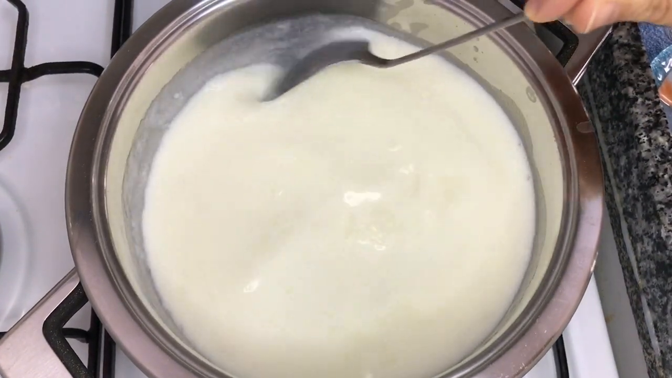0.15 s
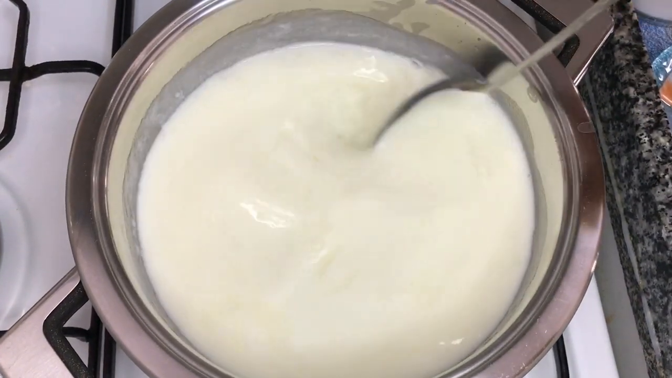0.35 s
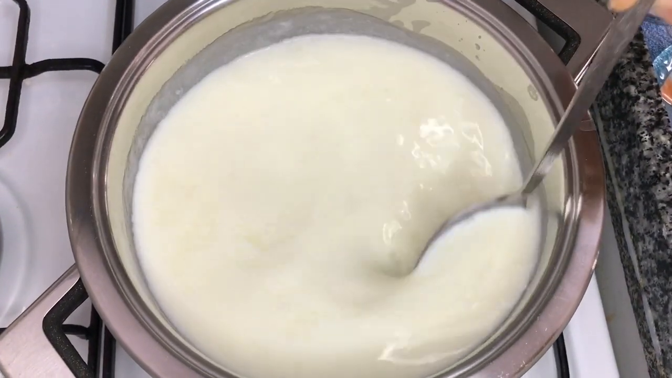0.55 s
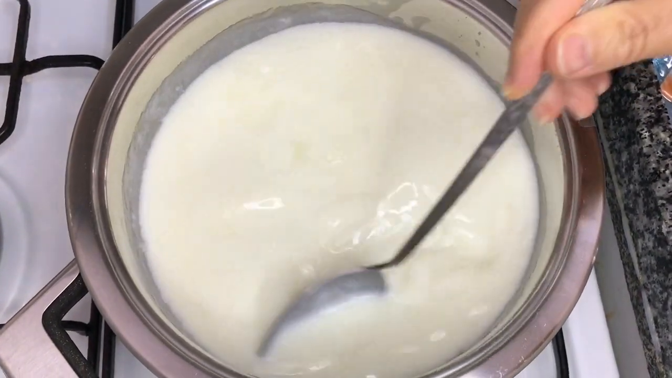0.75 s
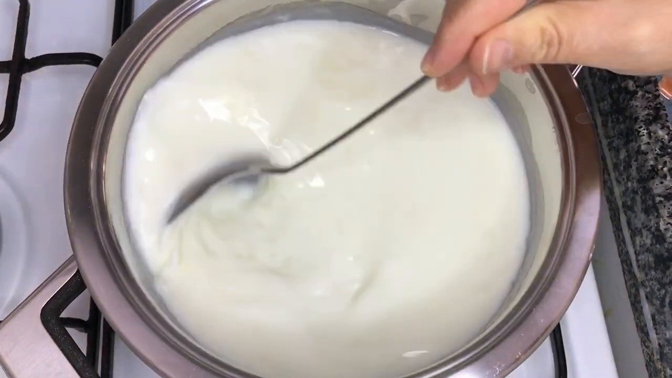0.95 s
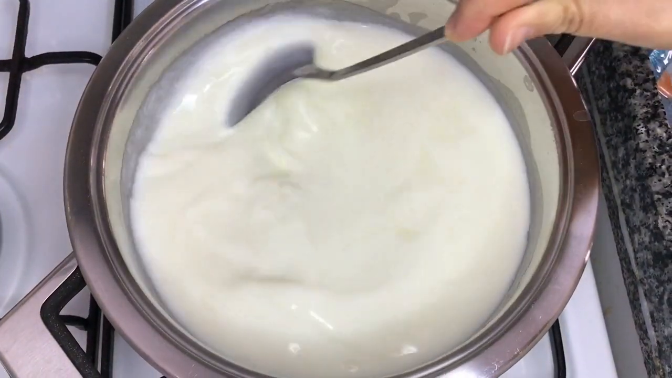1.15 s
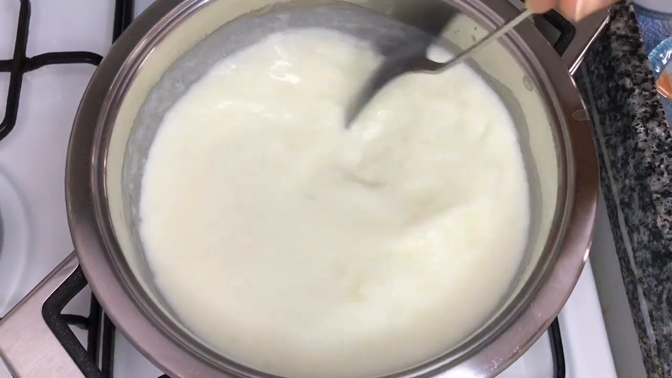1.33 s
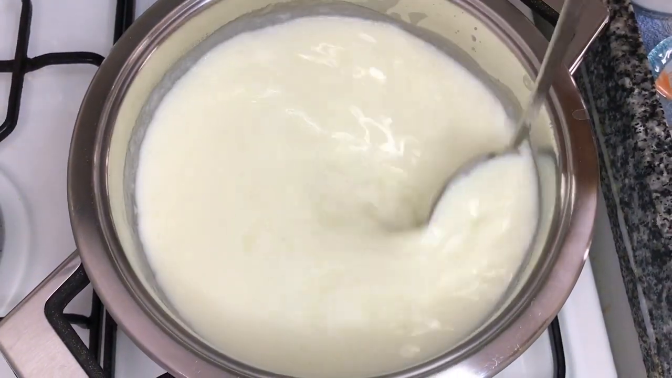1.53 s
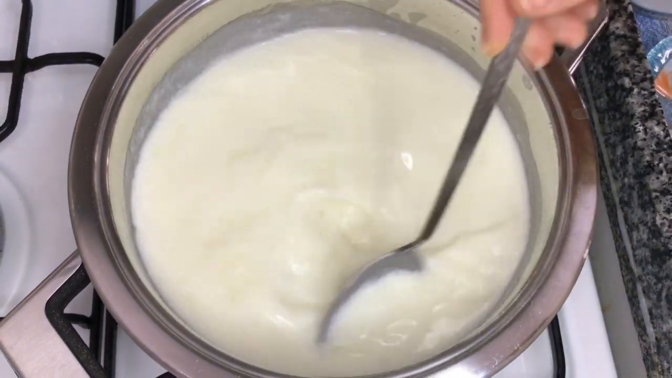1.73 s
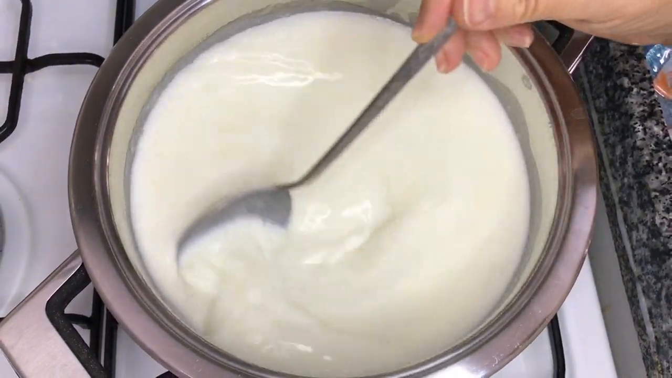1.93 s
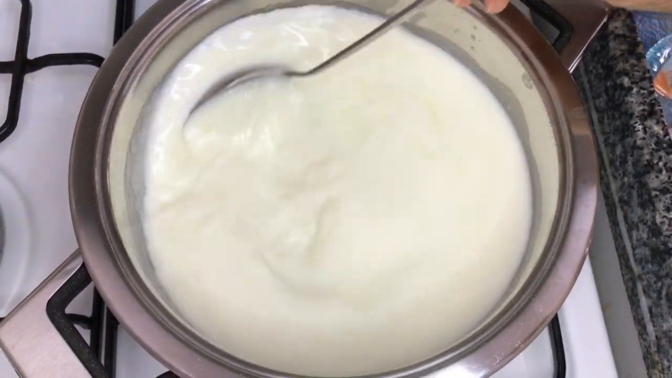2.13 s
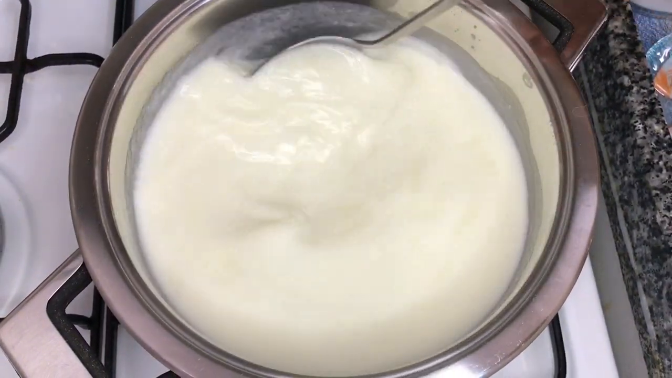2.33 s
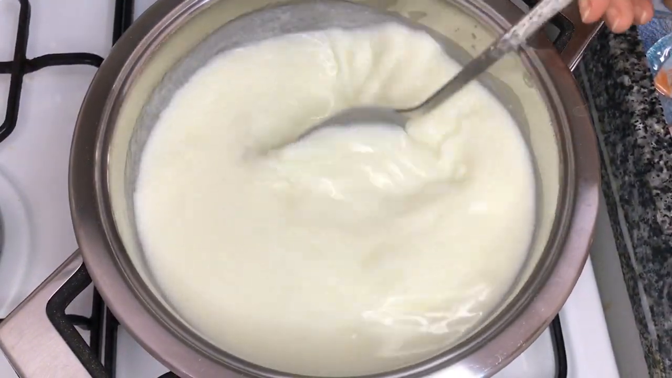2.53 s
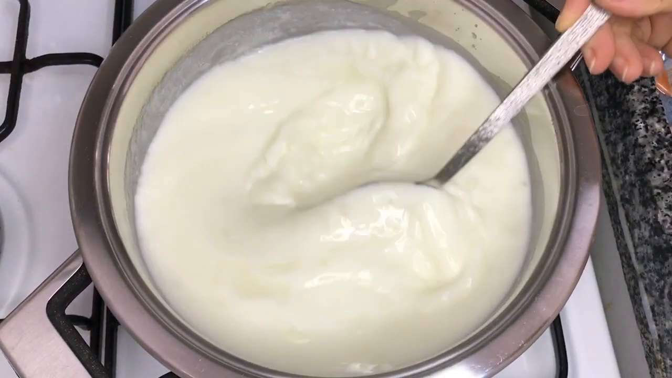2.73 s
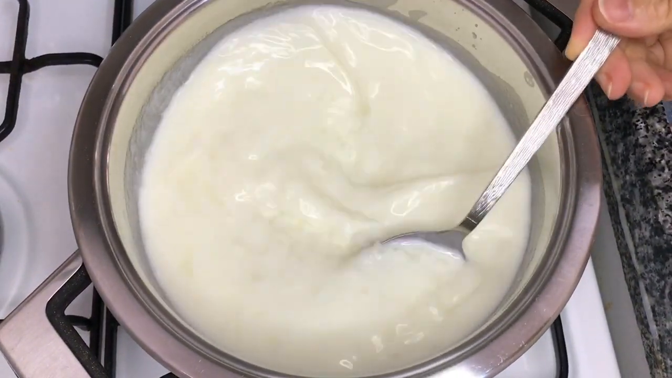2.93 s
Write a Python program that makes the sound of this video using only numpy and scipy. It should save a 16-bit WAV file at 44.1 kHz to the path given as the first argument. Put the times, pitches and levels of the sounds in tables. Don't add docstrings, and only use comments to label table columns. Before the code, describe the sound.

Spoon stirring in a steel pot: gritty ringing scrapes, several bright clinks, faint milky slops.

```python
import sys
import numpy as np
from scipy import signal
from scipy.fft import rfft, irfft
from scipy.io import wavfile
from scipy.ndimage import uniform_filter1d

SR = 44100
rng = np.random.default_rng(int(sys.argv[2]) if len(sys.argv) > 2 else 0)


def dump_mix(stems):
    frames = np.atleast_2d(stems).T
    limited = np.clip(frames, -1, 1)
    pcm = np.round(limited * 32767).astype(np.int16)
    wavfile.write(sys.argv[1], SR, pcm)


def voltage_ratio(level):
    return 10 ** (np.asarray(level, float) / 20)


N = 136710

# hz, level_db (per Hz)
CLANG = [(180, -59), (300, -8.5), (667, -15.5), (828, -17), (994, -1), (1510, 4), (2930, 6.5), (5340, 6.5),
         (16000, -50)]
CLUMP_DB, CLUMP_S = 3, .006


def evened(x):
    return x / np.sqrt(np.mean(x ** 2) + 1e-20)


def read(points, hz):
    f, value = np.transpose(points)
    return np.interp(np.log(hz + 1), np.log(f + 1), value)


def along(table, axis):
    rows = np.array(table)
    return np.interp(np.arange(N) / SR, rows[:, 0], rows[:, axis])


def add(mix, start_s, sound):
    part = mix[round(start_s * SR):][:len(sound)]
    part += sound[:len(part)]


def drift(span_s):
    wide = int(span_s * SR) + 1
    return evened(uniform_filter1d(uniform_filter1d(rng.standard_normal(N), wide), wide))


def coloured(x, points):
    gain = voltage_ratio(read(points, np.fft.rfftfreq(len(x), 1 / SR)))
    return evened(irfft(rfft(x) * gain, len(x)))


def resonate(x, hz, width_hz):
    turn = np.exp(2j * np.pi * np.cumsum(hz * np.ones(len(x))) / SR)
    r = np.exp(-np.pi * width_hz / SR)
    smooth = signal.lfilter([1 - r], [1, -r], x / turn)
    return evened((turn * smooth).real)


def ring(hz, t60_s, t):
    return np.sin(2 * np.pi * hz * t) * voltage_ratio(-60 * t / t60_s)


def burst(points, tilt_db, t60_points, length):
    hz, t, z = signal.stft(rng.standard_normal(length), SR, nperseg=128, noverlap=96)
    shape_db = read(points, hz) + tilt_db * np.log2(hz / 2500 + .01)
    fade_db = -60 * t / read(t60_points, hz)[:, None]
    x = signal.istft(z * voltage_ratio(shape_db[:, None] + fade_db), SR, nperseg=128, noverlap=96)[1][:length]
    return x / abs(x).max()


def patchy(x, patch_db):
    z = signal.stft(x, nperseg=256)[2]
    lumps = uniform_filter1d(rng.standard_normal(z.T.shape), size=8, axis=0)
    lumps = uniform_filter1d(lumps, size=4, axis=1)
    return evened(signal.istft(z * voltage_ratio(patch_db * evened(lumps).T), nperseg=256)[1][:N])


def scrape():
    # start_s, scrape_db, bowl_hz, tilt_db_per_octave, spoon_over_pot_db
    strokes = [
        [(.14, -54, 1300, 8, -12), (.25, -35, 1320, -6.5, 0), (.4, -32, 1363, -5, 0.5),
         (.63, -39.5, 1390, -0.5, 0)],
        [(.72, -47.5, 1310, -9.5, 2), (.82, -32, 1315, 0, -4.5), (1.06, -35, 1242, -2.5, 15.5),
         (1.1, -43, 1386, -11, 16)],
        [(1.21, -46.5, 1410, -13.5, 12), (1.26, -30.5, 1275, -3, 13), (1.45, -33, 1392, 0, 2),
         (1.68, -42.5, 1350, -0.5, 5.5)],
        [(1.77, -42.5, 1280, -7, -7.5), (1.84, -39.5, 1328, 0, -10.5), (2.12, -32.5, 1246, -1, 9.5),
         (2.23, -45, 1318, -10, 3)],
        [(2.31, -42, 1145, -3, -11), (2.36, -31, 1190, -4, -3.5), (2.57, -32, 1248, -6.5, -4.5),
         (2.64, -40.5, 1340, 3.5, -5)],
        [(2.75, -39.5, 1157, -3, 4), (2.82, -37.5, 1130, 1.5, -1.5), (2.96, -42.5, 1290, -4, -9.5),
         (3.08, -37, 1387, -4.5, -1.5)],
    ]
    # hz, level_db
    pot_modes = [(727, -10), (1570, -6), (1730, -11.5), (2045, -10), (2340, -3.5), (2500, -8), (2960, -16),
                 (3520, -6), (3800, -0.5), (4300, 0.5), (4520, 2.5), (4800, -3), (5330, -3.5), (5850, -3.5)]
    # multiple of bowl_hz, level_db
    spoon_modes = [(0.997, -2.5), (1.45, -13.5), (2.147, 2), (2.85, -4.5), (3.45, -1)]
    # hz, level_db (per Hz)
    rasp_spectrum = [(300, -98), (500, -11), (1000, -2.5), (2400, -3.5), (5000, -2), (8000, -9),
                     (15600, -28)]
    pot_damping, spoon_damping = .013, .035
    slips_per_s, slip_spread_db = 3000, 3.6
    jerk_db, jerk_s = 2.5, .058
    wander_db, wander_s = 2.2, .06
    rasp_db, patch_db = -7, 4.5

    stir = np.concatenate(strokes)
    slips = voltage_ratio(slip_spread_db * np.minimum(rng.exponential(1, N), 5)) * (rng.random(N) < slips_per_s / SR)
    slips = slips * rng.choice([-1., 1.], N) * voltage_ratio(jerk_db * drift(jerk_s))

    bowl_hz, tilt_db, share_db = along(stir, axis=2), along(stir, axis=3), along(stir, axis=4)
    modes = [(hz, pot_damping * hz, db - share_db / 2) for hz, db in pot_modes]
    for ratio, db in spoon_modes:
        modes.append((ratio * bowl_hz, spoon_damping * ratio * bowl_hz.mean(), db + share_db / 2))
    rings = np.zeros(N)
    for k, (hz, width_hz, db) in enumerate(modes):
        drive = np.roll(slips, 5003 * k) * voltage_ratio(CLUMP_DB * drift(CLUMP_S))
        level_db = db + tilt_db * np.log2(hz / 2500) + wander_db * drift(wander_s)
        rings += voltage_ratio(level_db) * resonate(drive, hz, width_hz)
    steel_band = signal.butter(2, [533, 8400], "band", fs=SR, output="sos")
    rings = signal.sosfilt(steel_band, rings)

    rasp = patchy(coloured(evened(slips) + rng.standard_normal(N), rasp_spectrum), patch_db)
    high = signal.lfilter(*signal.butter(2, 5000, "high", fs=SR), rasp)
    rasp = rasp + (voltage_ratio(1.6 * tilt_db) - 1) * high

    fade_in = np.clip((np.arange(N) / SR - stir[0, 0]) / .03, 0, 1)
    return fade_in * voltage_ratio(along(stir, axis=1)) * evened(evened(rings) + voltage_ratio(rasp_db) * rasp)


def catches():
    # start_s, peak_db, pitch_hz, t60_s
    snags = [(0.343, -28.5, 1330, 0.054), (0.377, -25.5, 1570, 0.075), (0.407, -26, 2900, .04),
             (0.426, -35, 4500, 0.027), (.53, -33.5, 4900, 0.034), (0.969, -28, 1235, 0.062),
             (1.002, -25, 3500, 0.042), (1.035, -27.5, 1800, 0.074), (1.1798, -28.5, 1395, 0.036),
             (1.203, -25.5, 1420, 0.048), (1.286, -23, 2520, 0.029), (1.3831, -23.5, 1855, 0.021),
             (1.409, -29, 2800, 0.037), (1.523, -28, 1620, 0.15), (1.525, -23, 2934, 0.036),
             (1.619, -37.5, 1630, 0.073), (1.962, -26, 4320, 0.034), (1.9625, -34, 2825, .03),
             (2.098, -28, 1207, 0.06), (2.418, -22, 4600, 0.036), (2.615, -25, 1540, 0.042),
             (2.76, -26, 2310, 0.069)]
    rise_s, spread = .001, .6
    out, t = np.zeros(N), np.arange(SR // 8) / SR
    for start_s, db, hz, t60_s in snags:
        rasp = burst(CLANG, 0, [(300, t60_s), (16000, 2.2 * t60_s)], len(t))
        rasp = resonate(rasp, hz, spread * hz)
        rasp = rasp / abs(rasp).max()
        rasp_db = -0.5 - np.log2(hz / 1500)
        body = ring(hz, t60_s, t) + voltage_ratio(rasp_db) * rasp
        add(out, start_s, voltage_ratio(db) * np.minimum(t / rise_s, 1) * body)
    return out


def rubbing(table):
    even_s, even_power, edge_share = .012, .7, .6
    out, noise = np.zeros(N), rng.standard_normal(N) * voltage_ratio(CLUMP_DB * drift(CLUMP_S))
    for k, (start_s, length_s, db, hz, width_hz) in enumerate(table):
        rub = noise[3001 * k:][:int(length_s * SR)]
        sung = resonate(resonate(rub, hz, 1.09 * width_hz), hz, 1.09 * width_hz)
        sung = signal.sosfilt(signal.butter(4, hz / 2, "high", fs=SR, output="sos"), sung)
        swell = uniform_filter1d(abs(sung), int(even_s * SR)) + .2
        sung = evened(sung / swell ** even_power)
        add(out, start_s, voltage_ratio(db) * sung * signal.windows.tukey(len(rub), edge_share))
    return out


def grinds():
    # start_s, length_s, rms_db, pitch_hz, width_hz
    songs = [(.3, 0.043, -38.5, 1600, 50), (.34, 0.14, -43, 1330, 121), (.37, 0.18, -43.5, 2900, 140),
             (.39, 0.14, -43.5, 1680, 102), (.495, 0.094, -38, 1565, 38.4), (.5, 0.08, -46.5, 4620, 149),
             (.56, 0.084, -49, 735, 29.8), (.8, 0.054, -41.5, 717, 29.4), (.8, 0.11, -42.5, 1364, 59),
             (.83, .13, -40, 2730, 160), (.96, 0.072, -44, 1207, 60.6), (.995, 0.11, -39, 3640, 216),
             (1.03, 0.023, -39, 1830, 150), (1.062, 0.023, -26.5, 1850, 1120), (1.09, 0.12, -53, 1350, 90),
             (2.29, 0.28, -44, 1186, 130), (1.25, 0.13, -33, 2410, 510), (1.25, 0.057, -42, 1230, 120),
             (1.33, 0.14, -39, 1864, 121), (1.43, 0.079, -35.5, 1492, 80), (1.47, 0.11, -41.5, 1670, 100),
             (1.57, 0.11, -47.5, 1610, 150), (1.62, 0.2, -48, 1370, 89), (1.81, 0.084, -43, 725, 39.7),
             (1.88, 0.11, -44, 2860, 200), (2.01, 0.16, -47, 1223, 80), (2.095, 0.049, -36.5, 1174, 450),
             (2.339, 0.15, -37, 2406, 107), (2.33, 0.16, -41.5, 3780, 101), (2.4, 0.17, -43, 1620, 120),
             (2.43, 0.15, -42, 753, 29), (2.45, 0.15, -55, 12100, 3500), (2.765, 0.096, -46.5, 2330, 130),
             (2.775, 0.11, -41, 3740, 885), (2.77, 0.18, -43, 5460, 890), (2.965, 0.048, -43.5, 740, 30.2),
             (2.63, 0.068, -45, 4560, 900), (3.02, 0.06, -42.5, 3900, 1530)]
    return rubbing(songs)


def clinks():
    # start_s, peak_db, tilt_db_per_octave, belly_db, rise_s
    hits = [
        (.2135, -3.5, 0, -13, .0005),
        (.7835, -11.5, 1.3, -20, .002),
        (1.2245, -8, 1.1, -18, .0025),
        (1.248, -15, .2, -20, .003),
        (1.7915, -14, .8, -16, .001),
    ]
    # hz, t60_s, level_db
    wall_modes = [(1566, 0.071, -7.5), (2090, 0.13, -19), (2574, 0.059, -12.5), (3797, 0.073, -15),
                  (4150, 0.023, -6)]
    # hz, t60_s
    clang_decay = [(300, 0.12), (1500, 0.1), (4000, 0.045), (8000, 0.04), (16000, 0.012)]
    spark_spectrum = [(3000, 3.5), (8000, 7.0), (16000, -21.0)]  # hz, level_db
    tick_db, tick_s, spark_db = -3, .0005, -27
    belly_hz, belly_t60_s = 725, .13
    out, t = np.zeros(N), np.arange(SR // 2) / SR
    for start_s, db, tilt_db, belly_db, rise_s in hits:
        wall = np.zeros(len(t))
        for hz, t60_s, mode_db in wall_modes:
            gain = voltage_ratio(mode_db + tilt_db * np.log2(hz / 2500))
            wall += gain * ring(hz * rng.uniform(0.98, 1.03), t60_s, t)
        tick = voltage_ratio(tick_db) * np.sin(2 * np.pi * 3900 * t) * np.exp(-((t - .001) / tick_s) ** 2)
        spark = coloured(rng.standard_normal(len(t)), spark_spectrum) * voltage_ratio(-60 * t / 0.045)
        spark = voltage_ratio(spark_db + 10 * tilt_db) * spark
        belly = voltage_ratio(belly_db) * ring(belly_hz, belly_t60_s, t)
        body = burst(CLANG, tilt_db, clang_decay, len(t)) + wall + tick + belly
        hit = body * np.minimum(t / rise_s, 1) + spark
        add(out, start_s, voltage_ratio(db) * hit / abs(hit).max())
    return out


def slops():
    # start_s, length_s, rms_db, pitch_hz, width_hz
    waves = [
        (.04, 0.53, -59, 306, 151),
        (.5, 0.12, -56.5, 575, 80),
        (.79, 0.096, -48, 380, 256),
        (1.23, 0.078, -58.5, 350, 200),
        (1.44, 0.17, -54.5, 318, 150),
        (1.55, 0.15, -50.5, 658, 101),
        (1.72, 0.28, -54, 341, 115),
        (2.6, 0.74, -66, 327, 120),
    ]
    return rubbing(waves)


def bubbles():
    # start_s, length_s, peak_db, first_hz, last_hz
    pockets = [
        (2.634, 0.052, -37, 684, 808),
        (2.672, 0.046, -27, 833, 2550),
        (2.728, 0.022, -34, 1000, 1800),
    ]
    top, sharp, snap, creep = .56, 3, .045, .5
    bend = np.log(.5) / np.log(top)
    out = np.zeros(N)
    for start_s, length_s, db, first_hz, last_hz in pockets:
        u = np.arange(0, length_s, 1 / SR) / length_s
        rise = creep * u + (1 - creep) / (1 + np.exp((top + 0.079 - u) / snap))
        hz = first_hz * (last_hz / first_hz) ** rise
        body = .3 * np.sin(np.pi * u) + .7 * abs(np.sin(np.pi * u ** bend)) ** (3 * sharp)
        add(out, start_s, voltage_ratio(db) * body * np.sin(2 * np.pi * np.cumsum(hz) / SR))
    return out


def thuds():
    # start_s, level_db
    shudders = [
        (0.224, -49.5),
        (0.789, -49.5),
        (1.234, -51),
        (1.801, -48),
    ]
    # hz, t60_s, level_db
    stove_modes = [(78.4, 1.84, 8.5), (113, 0.42, 5), (62, 1.2, 1)]
    hold_s, rise_s, release_s = .2, .0067, .029
    out, t = np.zeros(N), np.arange(SR // 2) / SR
    thud = sum(voltage_ratio(db) * ring(hz, t60_s, t) for hz, t60_s, db in stove_modes)
    thud = thud * np.minimum(t / rise_s, 1) * np.clip((hold_s - t) / release_s + 1, 0, 1)
    for start_s, db in shudders:
        add(out, start_s, voltage_ratio(db) * thud)
    return out


def stove_sway():
    # time_s, pitch_hz, level_db
    sway_path = [(0, 27.74, -50), (.45, 26.6, -47.5), (.75, 26.6, -44.5), (.93, 28.42, -53),
                 (1.05, 27.14, -38), (1.5, 28.14, -42), (2.0, 28.4, -47), (2.3, 28.9, -52),
                 (2.7, 29.77, -47)]
    rough_db, width_hz = -9.5, 23
    hz = along(sway_path, axis=1)
    shake = resonate(resonate(rng.standard_normal(N), hz, width_hz), hz, width_hz)
    hum = np.sqrt(2) * np.sin(2 * np.pi * np.cumsum(hz) / SR)
    return voltage_ratio(along(sway_path, axis=2)) * evened(hum + voltage_ratio(rough_db) * shake)


def gas_jets():
    # pitch_hz, width_hz, rms_db
    jets = [(2250, 130, -57), (2900, 540, -66), (4590, 340, -58.5), (5250, 170, -68), (9840, 1550, -62.5),
            (12220, 490, -70.5)]
    return sum(voltage_ratio(db) * resonate(resonate(rng.standard_normal(N), hz, width_hz), hz, width_hz)
               for hz, width_hz, db in jets)


def room():
    # hz, level_db (per Hz)
    hush_spectrum = [(88, -50), (150, -18.5), (333, -12.5), (530, -23.5), (1950, -22), (3300, -17),
                     (6510, -24.5), (8600, -31.5), (15600, -41)]
    # hz, level_db (per Hz)
    rumble_spectrum = [(8.8, -6), (15, -9), (38, -16), (113, -17), (173, -46), (335, -41), (400, -75),
                       (520, -72), (880, -120)]
    hush_db, rumble_db = -53, -49.5
    hush = voltage_ratio(hush_db + 0.35 * drift(0.011)) * coloured(rng.standard_normal(N), hush_spectrum)
    rumble = voltage_ratio(rumble_db + 2.5 * drift(0.18)) * coloured(rng.standard_normal(N), rumble_spectrum)
    return hush + rumble


def kitchen(x):
    t60_s, gap_s = .22, .006
    t = np.arange(SR // 2) / SR
    tail = rng.standard_normal(len(t)) * voltage_ratio(-60 * t / t60_s) * (t > gap_s)
    return signal.fftconvolve(x, tail / np.linalg.norm(tail))[:N]


def scene():
    near = scrape() + catches() + grinds() + clinks() + slops() + bubbles()
    far = thuds() + stove_sway() + gas_jets() + room()
    return (near + voltage_ratio(-12) * kitchen(near) + far)[None]


def roll_off(x):
    return signal.sosfilt(signal.butter(12, 16670, fs=SR, output="sos"), x)


def record(dry):
    dip_times = [0.641, 1.686, 1.733, 1.875, 1.92, 2.219, 2.309, 2.947, 2.984]
    dip_s, dip_db, dip_hz, edge_hz = .017, -13, 3500, 16250
    t = np.arange(N) / SR
    gate_db = sum(dip_db * np.exp(-((t - time_s) / (dip_s / 2)) ** 4) for time_s in dip_times)
    low = signal.sosfiltfilt(signal.butter(2, dip_hz, fs=SR, output="sos"), dry)
    gated = low + voltage_ratio(gate_db) * (dry - low)
    band_limit = signal.firwin(255, edge_hz, window=("kaiser", 9), fs=SR)[None]
    return roll_off(signal.oaconvolve(gated, band_limit, "same"))


dry = scene()
out = record(dry)
dump_mix(out)
```